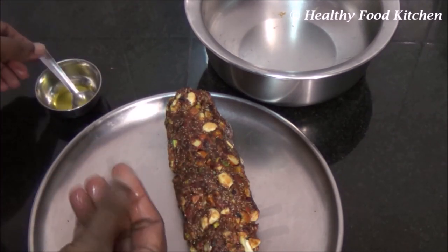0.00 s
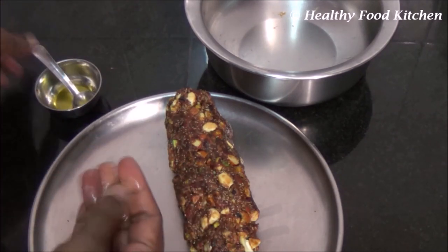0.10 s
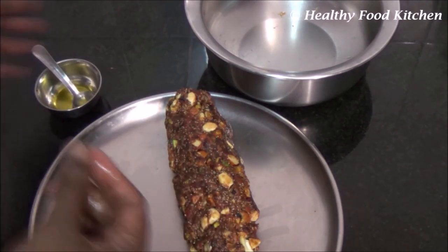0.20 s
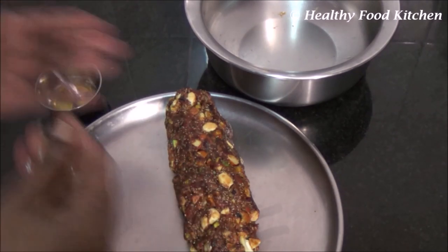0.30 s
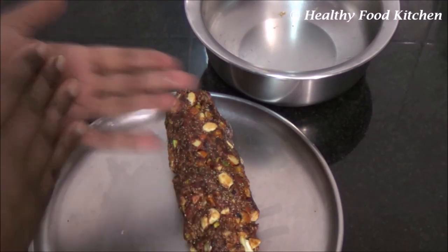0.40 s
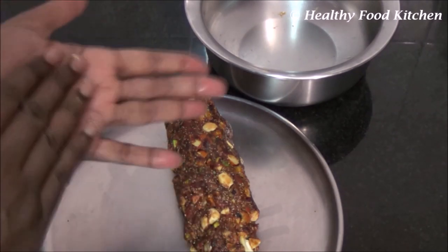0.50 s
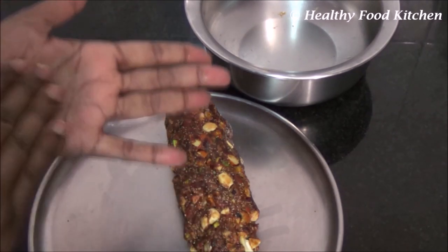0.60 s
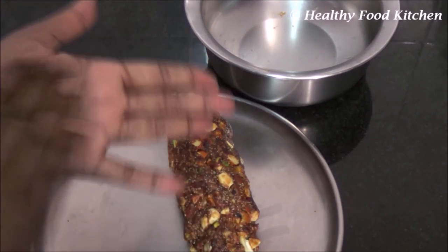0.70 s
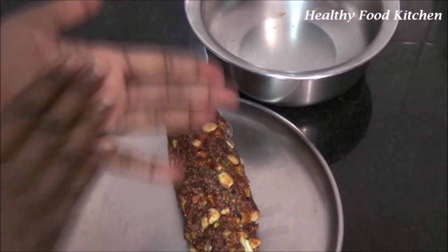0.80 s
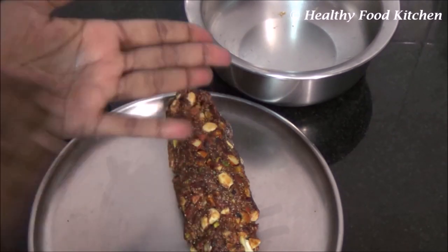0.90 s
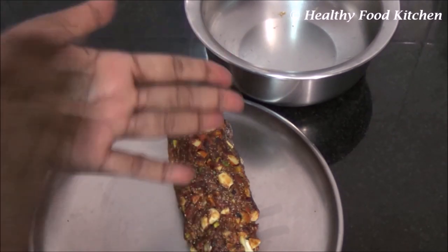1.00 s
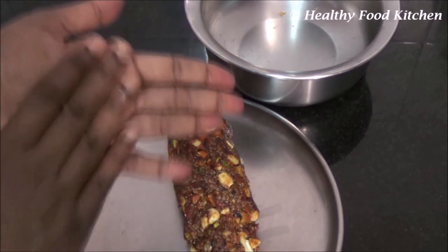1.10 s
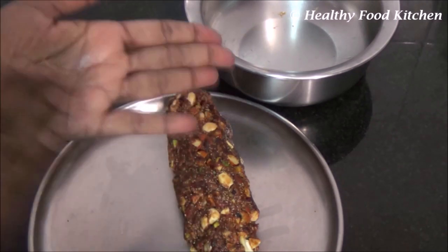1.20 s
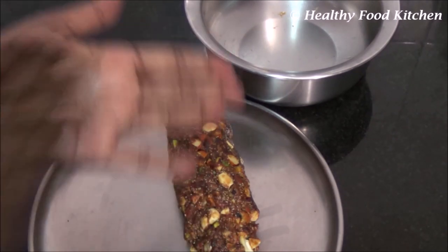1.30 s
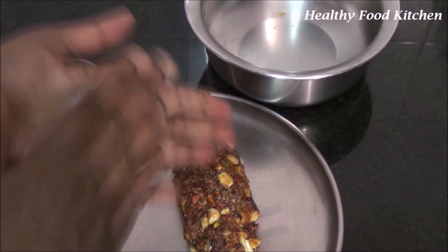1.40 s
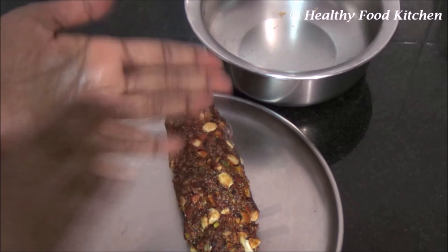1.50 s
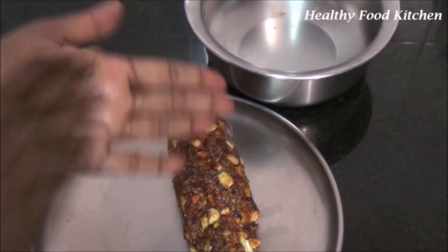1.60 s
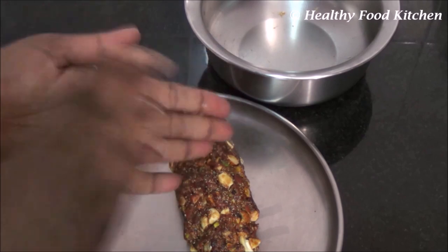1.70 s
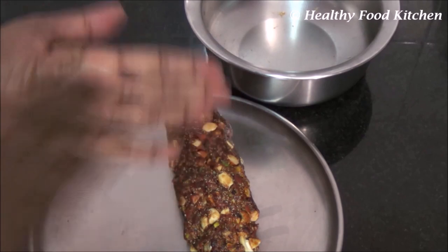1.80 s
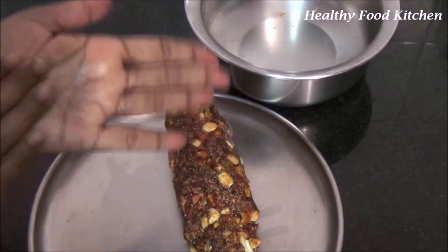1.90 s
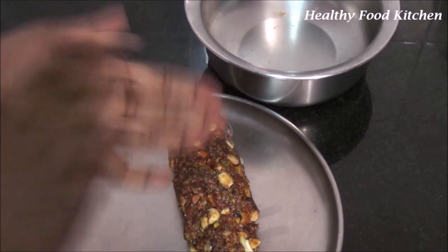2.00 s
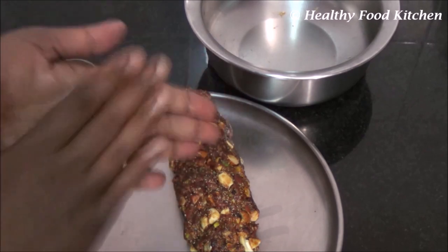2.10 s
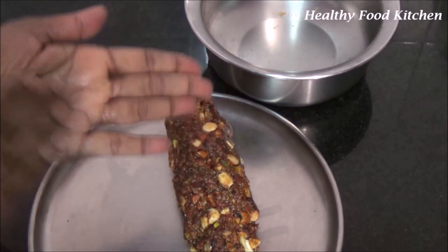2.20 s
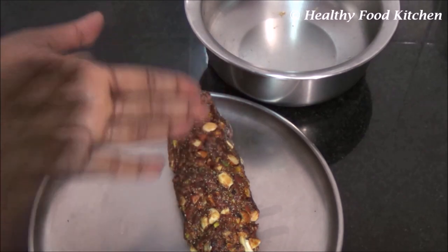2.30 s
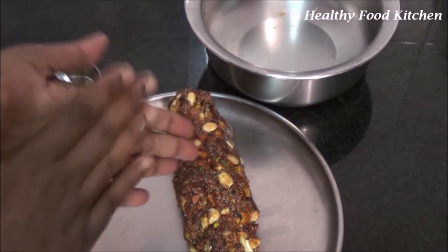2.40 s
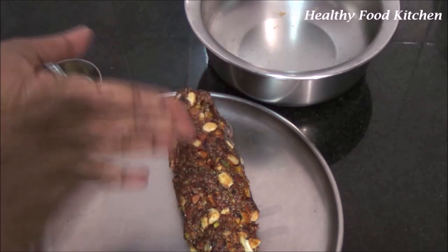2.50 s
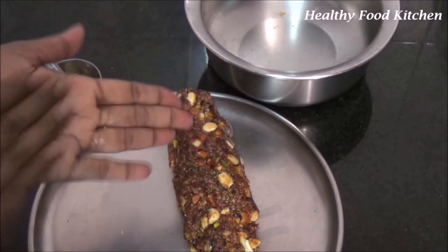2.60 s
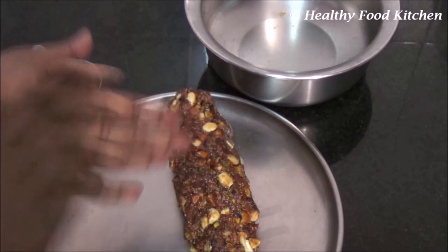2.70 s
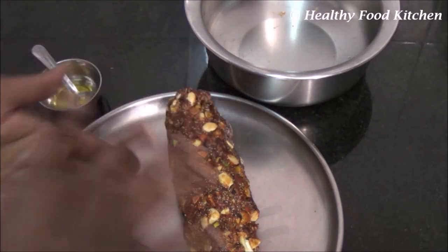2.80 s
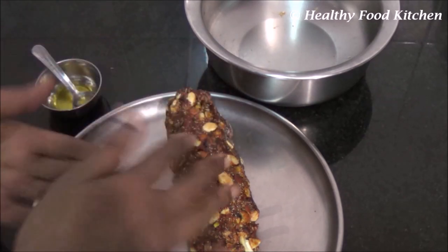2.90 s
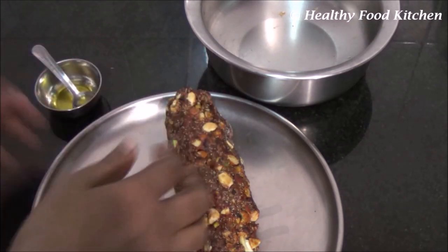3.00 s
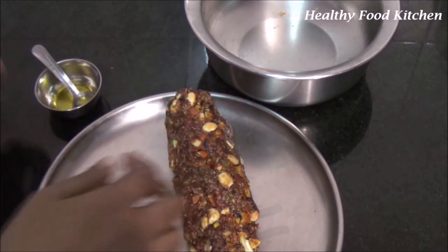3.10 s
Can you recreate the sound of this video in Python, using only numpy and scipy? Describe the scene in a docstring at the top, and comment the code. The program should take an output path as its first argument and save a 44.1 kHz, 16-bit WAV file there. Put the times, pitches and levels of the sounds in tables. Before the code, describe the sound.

Oiled palms rub together close up in quick airy strokes, after a single sharp snap that faintly rings a steel plate; a few tiny ticks, small hard kitchen, steady low motor hum.

```python
"""Oiled palms in a hard kitchen

Oiled palms rub back and forth close by: dense random slips, coloured as skin and ringing a hollow.
A sharp snap of a few broadband cracks rings a steel plate early on; faint ticks are short dying sines.
A tail of random taps answers as the small room; a fridge-like motor hums in sines over shaped noise."""
import sys
import numpy as np
from scipy import signal
from scipy.io import wavfile
from scipy.ndimage import uniform_filter1d

SR = 44100
rng = np.random.default_rng(int(sys.argv[2]) if len(sys.argv) > 2 else 0)


def inscribe(sig):
    """Save sig as 16-bit PCM at rate SR to the path in sys.argv[1].

    A 1-D sig is mono; a 2-D sig holds one channel per row.
    Samples are clipped to [-1, 1] before scaling.
    """
    pcm = np.round(np.clip(np.atleast_2d(sig).T, -1, 1) * 32767)
    wavfile.write(sys.argv[1], SR, pcm.astype(np.int16))


def makeup_ratio(level_db):
    """Linear amplitude ratio for a level in decibels (20 dB per factor of ten)."""
    decades = np.asarray(level_db, float) / 20
    return 10 ** decades


N = 141120  # length in samples
SIDE = np.array([[1], [-1]])  # left, right


def evened(x):
    """Scales to rms 1."""
    return x / np.sqrt(np.mean(x ** 2) + 1e-20)


def read(points, hz):
    """Reads a table on a log-frequency axis."""
    f, value = np.transpose(points)
    return np.interp(np.log(hz + 1), np.log(f + 1), value)


def resonate(x, hz, width):
    """A resonance of gain 1 that follows the curve hz: shift down, smooth, shift back up."""
    turn = np.exp(2j * np.pi * np.cumsum(hz * np.ones(len(x))) / SR)
    r = np.exp(-np.pi * width / SR)
    smooth = signal.lfilter([1 - r], [1, -r], x / turn + 1e-18)
    return 2 * (turn * smooth).real


def patches(shape, db):
    """Random gain patches over frequency and time, with an rms spread of db."""
    blurred = uniform_filter1d(rng.standard_normal(shape), size=8, axis=0)
    blurred = uniform_filter1d(blurred, size=12, axis=1)
    return makeup_ratio(db * evened(blurred))


def ring(hz, db, t60):
    """One mode that dies exponentially after a soft start."""
    rise_s = .00008
    t = np.arange(SR // 2) / SR
    envelope = makeup_ratio(db - 60 * t / t60) * (1 - np.exp(-t / rise_s))
    return envelope * np.sin(2 * np.pi * hz * t)


def add(mix, s, sound):
    """Mixes a sound in at s seconds."""
    part = mix[round(s * SR):][:len(sound)]
    part += sound[:len(part)]


# Colour of the room noise. Each row: frequency in Hz, relative density in dB per Hz.
AIR_COLOUR = [(15, -51), (25, -18), (53, -23), (91, -18), (228, -15), (291, -14.5), (403, -12), (542, -16),
              (929, -20), (1590, -24.5), (2730, -23), (3220, -28.5), (3580, -28), (5520, -31), (15800, -37)]
# How alike the noise is left and right. Each row: frequency in Hz, likeness from 0 to 1.
AIR_LIKENESS = [(30, .99), (150, 0.86), (400, 0.82), (1000, 0.11), (2500, 0.24), (6000, 0.49), (13000, 1)]


def air():
    """Diffuse room noise: shaped random spectra, most alike left and right in the bass and treble."""
    level_db, patch_db = -51.5, 1.9  # overall rms, spread of the patches
    hz = np.fft.rfftfreq(2048, 1 / SR)
    a, b, c, d = rng.standard_normal((N // 512 + 5, 1025, 4)).T
    same = np.clip(read(AIR_LIKENESS, hz), -1, 1)[:, None]
    left = a + 1j * b
    right = same * left + np.sqrt(1 - same ** 2) * (c + 1j * d)
    z = np.array([left, right]) * makeup_ratio(read(AIR_COLOUR, hz))[:, None] * patches(a.shape, patch_db)
    noise = signal.istft(z, nperseg=2048, noverlap=1536)[1][:, :N]
    return makeup_ratio(level_db) * evened(noise)


# Motor harmonics. Each row: multiple of the motor rate, level in dB rms before it wavers.
MOTOR_HARMONICS = [(1, -63.5), (5, -69), (6, -48), (7, -57), (17, -73), (19, -72), (27, -71.5), (55, -73.5),
                   (74, -72)]


def hum():
    """Motor harmonics whose levels waver at random, a fuzzy low drone and a thin electric whine."""
    motor_hz, waver_cutoff_hz = 49.24, 13.4
    drone_hz, drone_width_hz, drone_db = 122.5, 10.7, -63
    whine_hz, whine_db = 15625, -74
    t = np.arange(N) / SR
    out = np.zeros(N)
    slow = signal.butter(2, waver_cutoff_hz, fs=SR, output="sos")
    for k, db in MOTOR_HARMONICS:
        waver = evened(signal.sosfilt(slow, rng.standard_normal(N)))
        waver_db = 1.5 if k < 10 else 3.5  # the higher multiples waver more
        tone = np.sin(2 * np.pi * (round(k) * motor_hz * t + rng.random()))
        out += np.sqrt(2) * makeup_ratio(db + waver_db * waver) * tone
    drone = resonate(rng.standard_normal(N), drone_hz, drone_width_hz)
    out += makeup_ratio(drone_db) * evened(drone)
    return out + np.sqrt(2) * makeup_ratio(whine_db) * np.sin(2 * np.pi * whine_hz * t)


# Faint ticks. Each row: start in seconds, starting level in dB before the soft start, centre in Hz.
FAINT_TICKS = [(0.1161, -30, 7800), (0.1815, -34, 9920), (0.636, -32.5, 5860), (0.6494, -43, 6390),
               (1.957, -31, 7910), (2.3116, -38, 11300), (3.1123, -26, 12100)]


def ticks():
    """Faint ticks, each one very short dying mode; second, what of them feeds the room."""
    t60_s, wet_db = .0012, -10
    out, fed = np.zeros(N), np.zeros(N)
    for s, db, hz in FAINT_TICKS:
        add(out, s, ring(hz, db, t60_s))
        add(fed, s, ring(hz, db + wet_db, t60_s))
    return out, fed


# Decay of the room. Each row: frequency in Hz, t60 in seconds.
ROOM_DECAY = [(500, 0.8), (800, 0.59), (1400, 0.92), (2700, 0.72), (5000, 0.56), (9000, 0.48),
              (14000, 0.31)]
# Colour of the room's answer. Each row: frequency in Hz, relative level in dB.
TAIL_COLOUR = [(400, -5), (800, 17.5), (1400, 5), (2600, 3), (5000, -1.5), (9000, 0.5), (14000, -3.5)]
# How alike the tail is left and right. Each row: frequency in Hz, likeness from 0 to 1.
TAIL_LIKENESS = [(300, 1), (1000, .2), (2500, 0.28), (6000, 0.52), (12000, 0.96)]


def room(x):
    """Reverberation: sparse taps of random sign, each band dying at its own speed."""
    early_db, early_t60_s = 3.5, 0.078  # boost over the tail: nearby counter and bowls answer first
    taps = np.zeros((2, SR))
    at = np.arange(100, SR - 20, 10) + rng.integers(0, 10, (2, (SR - 120) // 10))
    np.put_along_axis(taps, at, rng.choice([-1., 1.], at.shape), 1)
    hz, t, z = signal.stft(taps, SR, nperseg=256)
    same = np.clip(read(TAIL_LIKENESS, hz), 0, 1)[:, None]
    z[1] = same * z[0] + np.sqrt(1 - same ** 2) * z[1]
    z *= 1 + makeup_ratio(early_db - 60 * t / early_t60_s)
    fade_db = read(TAIL_COLOUR, hz)[:, None] - 60 * t / read(ROOM_DECAY, hz)[:, None]
    tail = signal.istft(z * makeup_ratio(fade_db), SR, nperseg=256)[1]
    tail = tail / np.linalg.norm(tail, axis=1)[:, None]
    return signal.fftconvolve(x[None], tail, axes=1)[:, :N]


# Colour of one crack. Each row: frequency in Hz, relative level in dB.
CRACK_COLOUR = [(400, -16), (600, -16.5), (760, -12), (930, -19.5), (1200, -22), (1900, -15), (2800, -1.5),
                (3400, -11), (4000, -8.5), (5500, -7.5), (6500, -7.5), (8000, -3.5), (10000, -5),
                (12300, 2), (13300, -2), (14000, -23), (14600, -14), (16000, -24)]


def crack():
    """A causal (minimum-phase) click with the colour of the snap, peak 1."""
    hz = abs(np.fft.fftfreq(4096, 1 / SR))
    log = np.log(makeup_ratio(read(CRACK_COLOUR, hz)))
    click = np.fft.ifft(np.exp(np.conj(signal.hilbert(log)))).real[:2048]
    return click / abs(click).max()


# Cracks of the snap and its near echoes. Each row: start in seconds, relative peak in dB.
CRACKS = [(.2230, -12), (.2234, -12), (.2237, -14), (.2244, -15), (.2250, -21), (.2286, -18), (.2291, -22),
          (.2352, -21)]
# Modes of the steel plate. Each row: frequency in Hz, starting level in dB, t60 in seconds.
PLATE_MODES = [(714, -53.5, 0.32), (760, -52, 0.49), (916, -54, 0.52), (2730, -50, 0.67)]


def snap():
    """Cracks of random sign over the plate's dying modes; second, what of them feeds the room."""
    gain_db, wet_db = 2, 5.5
    out, fed, click = np.zeros(N), np.zeros(N), crack()
    for (s, db), sign in zip(CRACKS, rng.choice([-1., 1.], len(CRACKS))):
        add(out, s, sign * makeup_ratio(db + gain_db) * click)
    first_s, first_db = CRACKS[0]
    add(fed, first_s, makeup_ratio(first_db + gain_db + wet_db) * click)
    add(out, first_s, sum(ring(*mode) for mode in PLATE_MODES))  # the plate rings along
    return out, fed


# Rubbing strokes. Each row: time in seconds, relative level of the skin hiss in dB,
# relative level of the hollow between the palms in dB, pitch of the hollow in Hz.
STROKES = [(0.6, -79, -75, 2860), (0.63, -77, -77, 3300), (0.64, -59, -61, 3700), (0.69, -83, -78, 3520),
           (0.76, -59.5, -66, 3600), (0.82, -66.5, -80, 3600), (0.87, -59, -62, 3320),
           (0.93, -53, -61, 2650), (0.97, -63, -61, 3220), (1.04, -50.5, -64, 3600), (1.09, -57, -71, 3580),
           (1.17, -52.5, -72, 3720), (1.23, -47.5, -58, 2770), (1.29, -56.5, -56, 2980),
           (1.35, -50.5, -56, 3650), (1.37, -50.5, -78, 3700), (1.43, -55.5, -68, 3770),
           (1.54, -46, -69, 3770), (1.58, -48.5, -73, 3690), (1.6, -47.5, -45.5, 3670),
           (1.65, -44.5, -52, 3760), (1.7, -46.5, -69, 3920), (1.76, -52, -51, 4740),
           (1.82, -51, -76, 3480), (1.89, -48.5, -55, 3000), (1.93, -61, -56.5, 3060),
           (1.97, -49.5, -60, 3940), (2.0, -42.5, -43, 3850), (2.04, -46.5, -58, 4000),
           (2.09, -63, -69, 3660), (2.13, -54.5, -59, 3400), (2.19, -46, -75, 3570), (2.27, -58, -62, 3050),
           (2.32, -45.5, -47, 4000), (2.35, -43, -47, 4400), (2.37, -48, -73, 4470), (2.43, -56, -59, 4120),
           (2.45, -53.5, -49.5, 4240), (2.49, -49.5, -72, 3390), (2.55, -49, -80, 3740),
           (2.57, -52.5, -68, 3720), (2.61, -60, -62, 3150), (2.68, -46.5, -47.5, 3430),
           (2.73, -51, -60, 3140), (2.78, -65, -68, 3480), (2.79, -58, -54, 3630), (2.85, -53.5, -74, 3590),
           (2.96, -52, -55, 3580), (2.98, -56, -65, 3250), (3.06, -83, -77, 2950)]
# Colour of the skin hiss. Each row: frequency in Hz, relative density in dB per Hz.
SKIN_COLOUR = [(150, -43), (500, -3.5), (900, -15.5), (1500, -12), (2500, -8.5), (4000, -8), (6000, -3.5),
               (8500, -7), (11000, -2.5), (12800, -6), (14200, -10), (15800, -16)]
# Share of the hiss that differs left to right. Each row: frequency in Hz, relative level in dB.
SKIN_WIDTH = [(700, -7), (2000, -8), (5000, -14), (9000, -12.5), (13000, -24.5)]


def rub():
    """Dense tiny slips of skin ridges, spread over both hands, also ring the hollow between the palms."""
    slips_per_s, slip_spread_db = 16000, 1.5
    patch_db, wide_patch_db = 1.7, 5.5
    hollow_width_hz = 1100  # of each of two passes
    skin_gain_db, hollow_gain_db = 3, -2
    s, skin_db, hollow_db, hollow_hz = np.transpose(STROKES)
    t = np.arange(N) / SR

    sign = rng.choice([-1., 1.], (2, N))
    happens = rng.random((2, N)) < slips_per_s / SR
    slips = sign * happens * makeup_ratio(slip_spread_db * rng.exponential(1, (2, N)))

    hz, _, z = signal.stft(slips, SR, nperseg=512)
    z[0] *= patches(z[0].shape, patch_db)
    z[1] *= makeup_ratio(read(SKIN_WIDTH, hz))[:, None] * patches(z[0].shape, wide_patch_db)
    coloured = z * makeup_ratio(read(SKIN_COLOUR, hz))[:, None]
    mid, wide = signal.istft(coloured, SR, nperseg=512)[1][:, :N]
    skin = np.array([mid + wide, mid - wide]) / mid.std()

    pitch = np.interp(t, s, hollow_hz)
    hollow = resonate(slips[0], pitch, hollow_width_hz)
    hollow = evened(resonate(hollow, pitch, hollow_width_hz))

    skin_level = makeup_ratio(np.interp(t, s, skin_db, left=-90, right=-90) + skin_gain_db)
    hollow_level = makeup_ratio(np.interp(t, s, hollow_db, left=-90, right=-90) + hollow_gain_db)
    return skin_level * skin + hollow_level * hollow


def scene():
    """Hands near the centre, snap and ticks a little left, room tail and background."""
    rub_left_db, click_left_db, rub_wet_db = 0.14, 1, -8.5  # left up and right down by this; room feed
    skin = rub()
    snap_out, snap_fed = snap()
    tick_out, tick_fed = ticks()
    near = skin * makeup_ratio(rub_left_db * SIDE) + (snap_out + tick_out) * makeup_ratio(click_left_db * SIDE)
    fed = makeup_ratio(rub_wet_db) * skin.mean(0) + snap_fed + tick_fed
    return near + room(fed) + hum() + air()


def roll_off(x):
    """The treble ends steeply here."""
    return signal.sosfilt(signal.butter(12, 16810, fs=SR, output="sos"), x)


def record(dry):
    """Steep low-pass that limits the band of the finished mix."""
    edge_hz = 15740
    lowpass = signal.firwin(1201, edge_hz, window=("kaiser", 7), fs=SR)
    mix = signal.oaconvolve(dry, lowpass[None], "same")
    return roll_off(mix)


dry = scene()
out = record(dry)
inscribe(out)
```